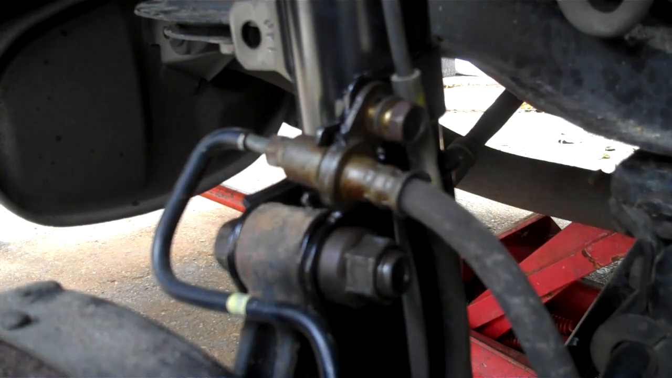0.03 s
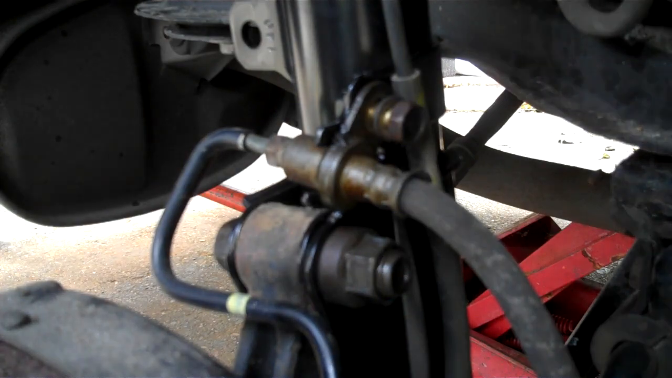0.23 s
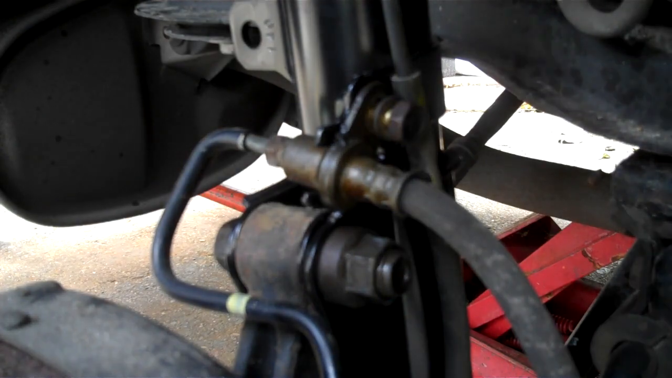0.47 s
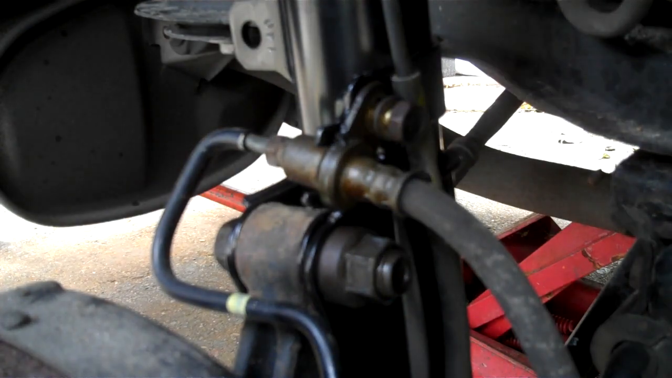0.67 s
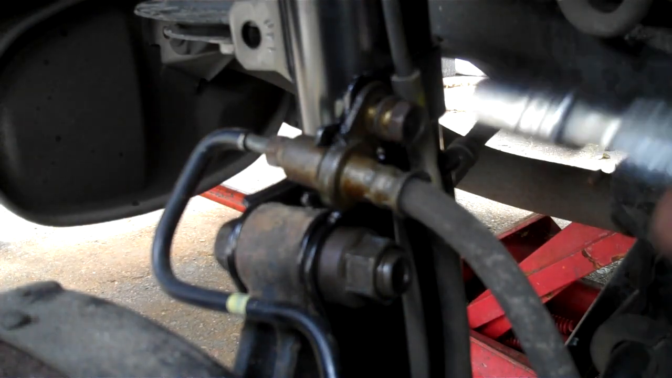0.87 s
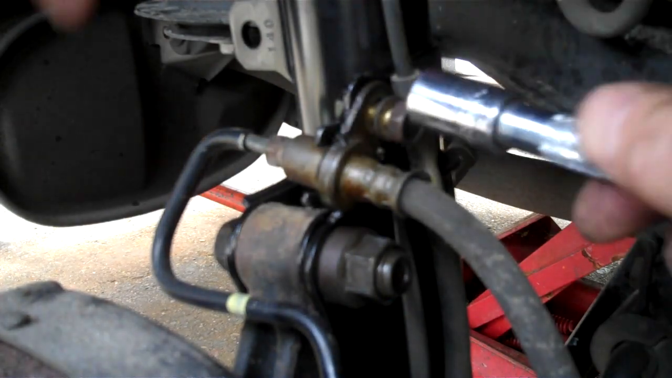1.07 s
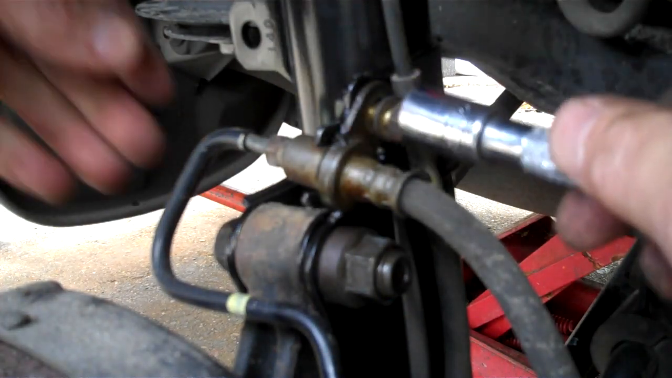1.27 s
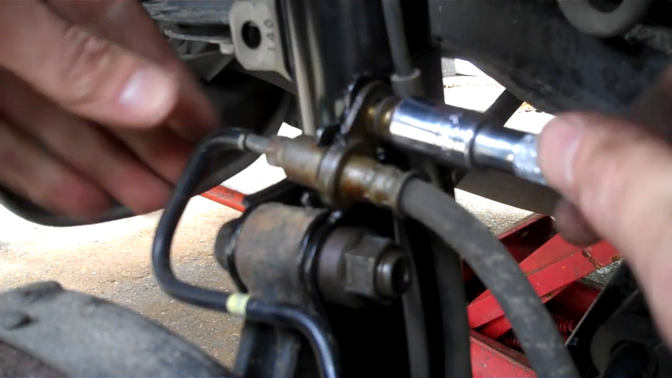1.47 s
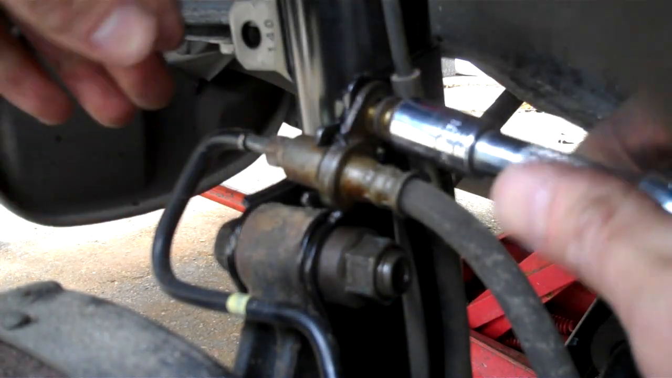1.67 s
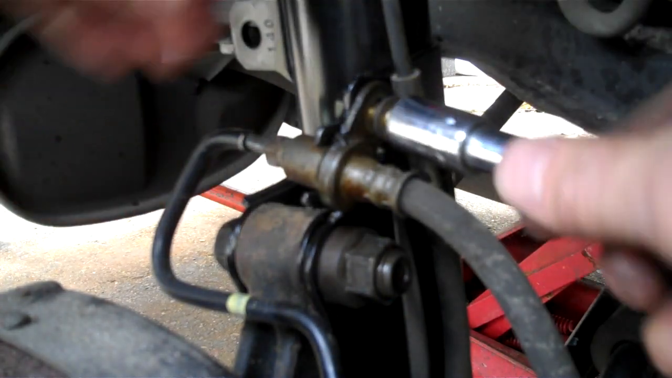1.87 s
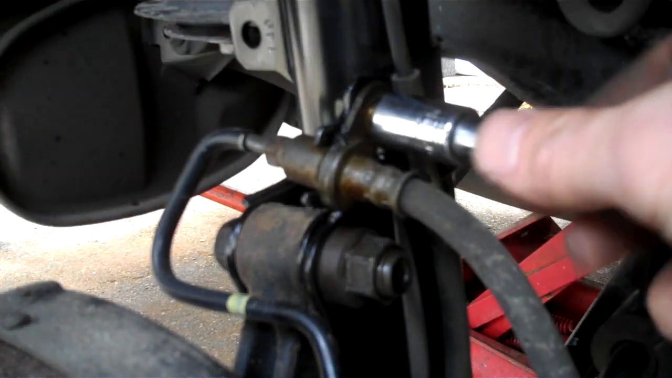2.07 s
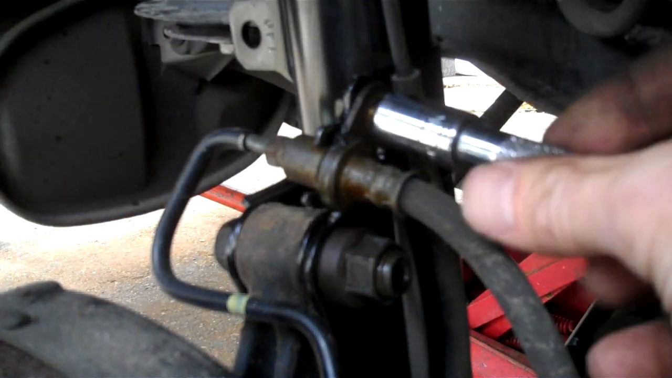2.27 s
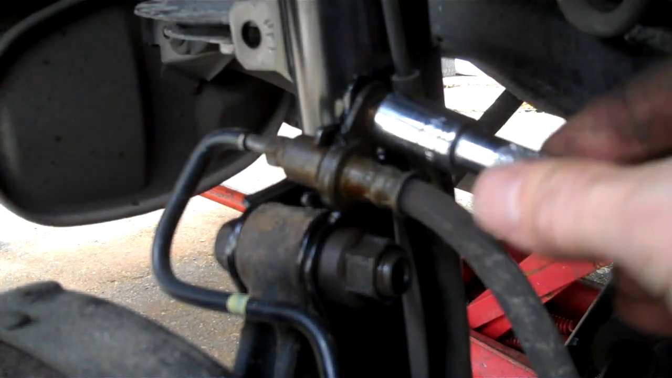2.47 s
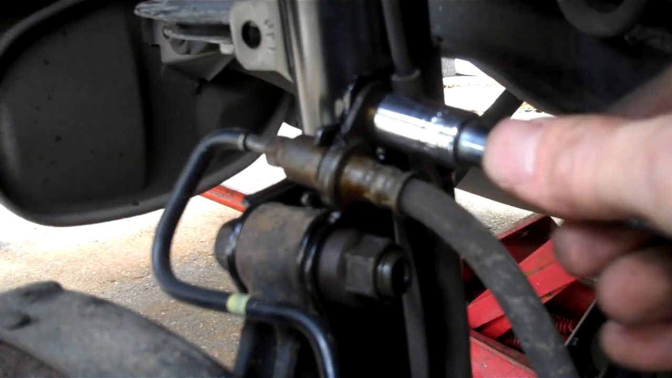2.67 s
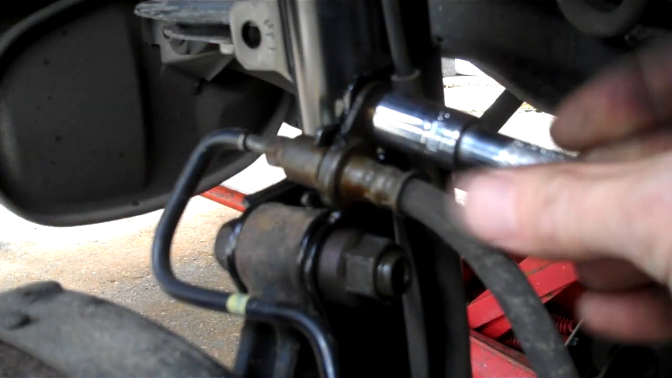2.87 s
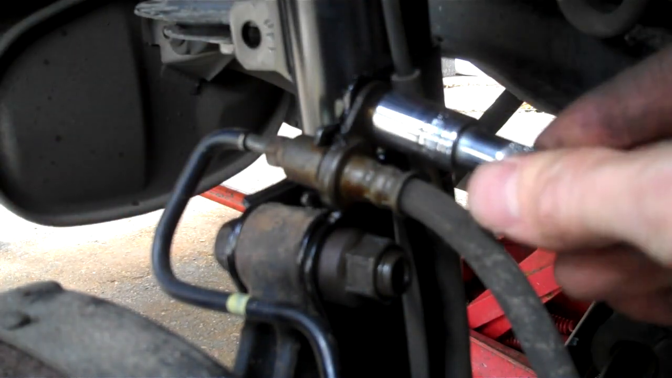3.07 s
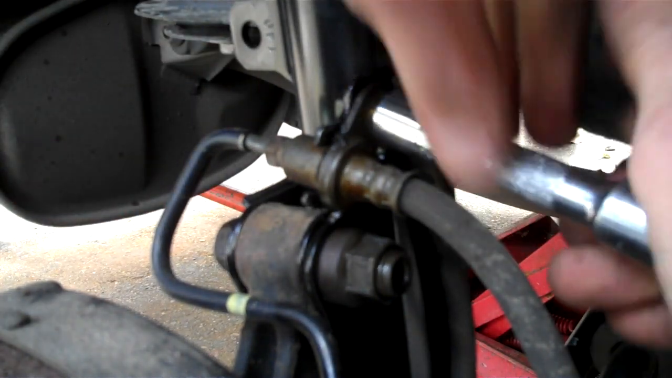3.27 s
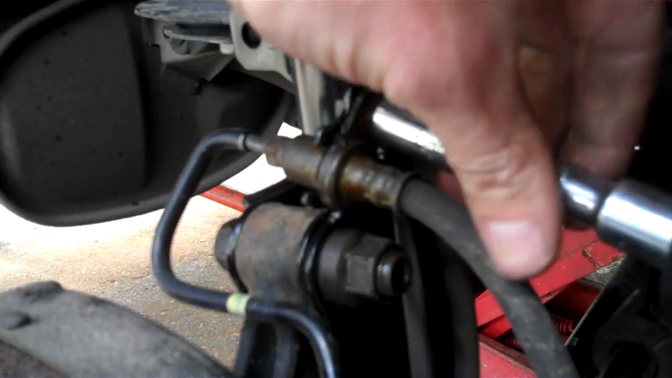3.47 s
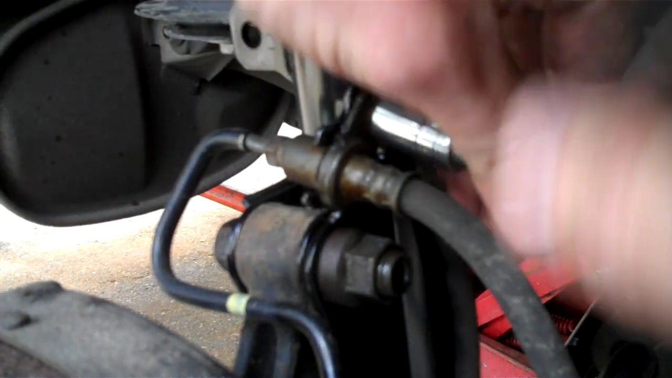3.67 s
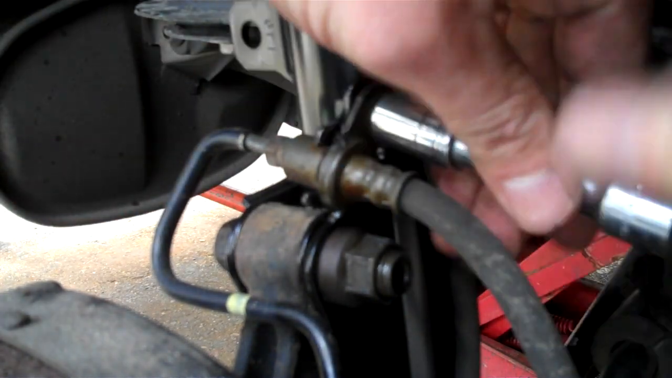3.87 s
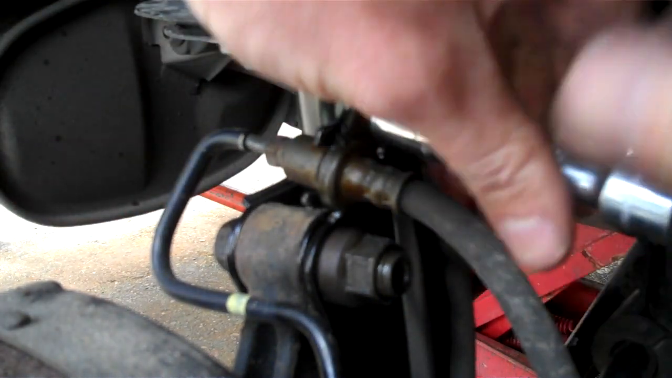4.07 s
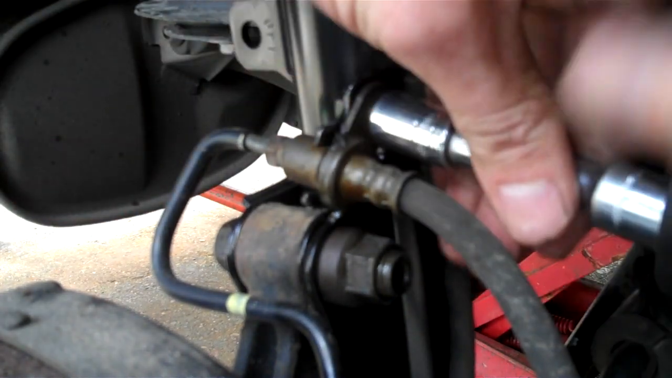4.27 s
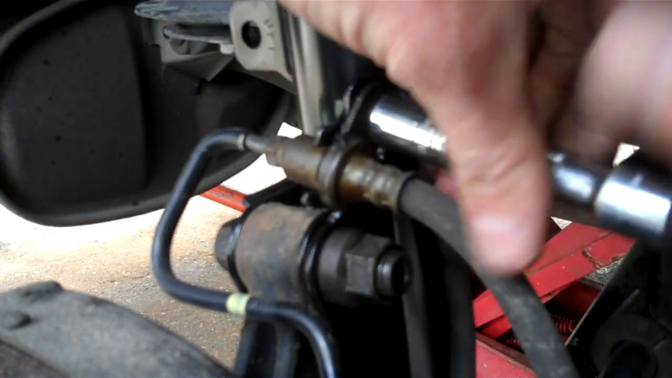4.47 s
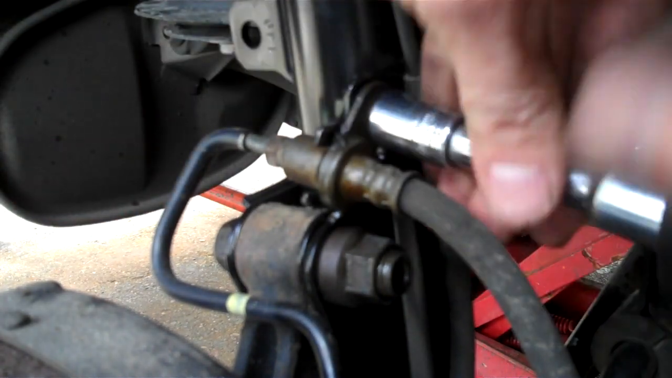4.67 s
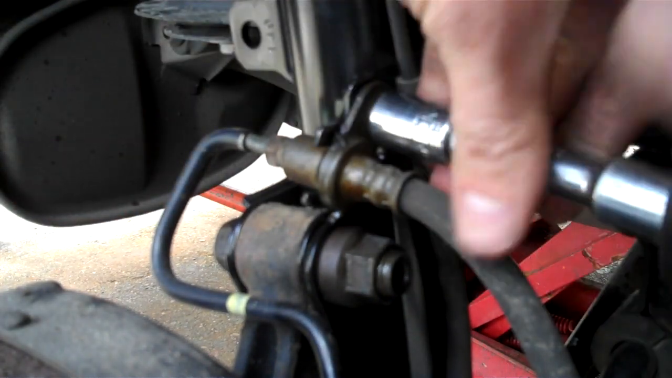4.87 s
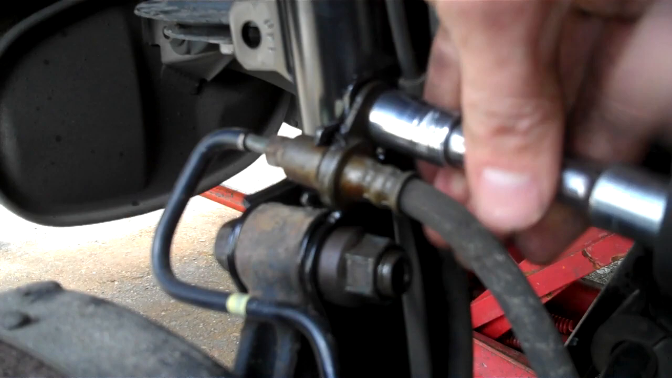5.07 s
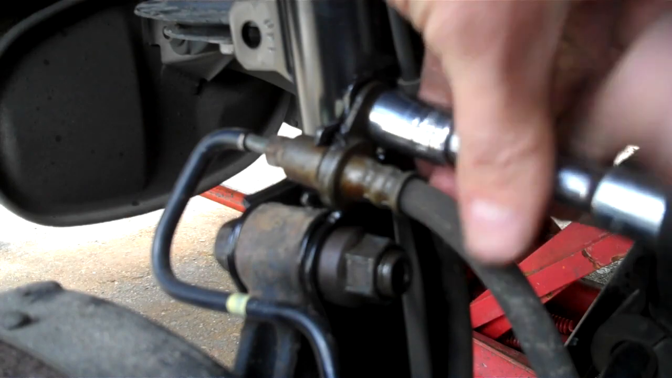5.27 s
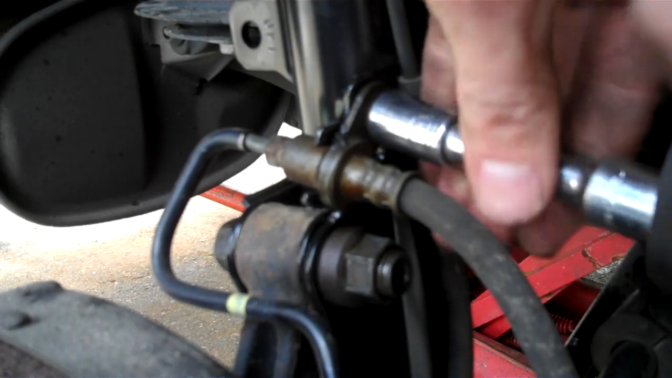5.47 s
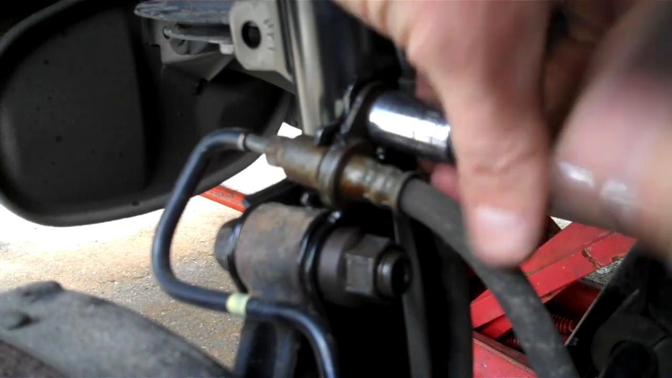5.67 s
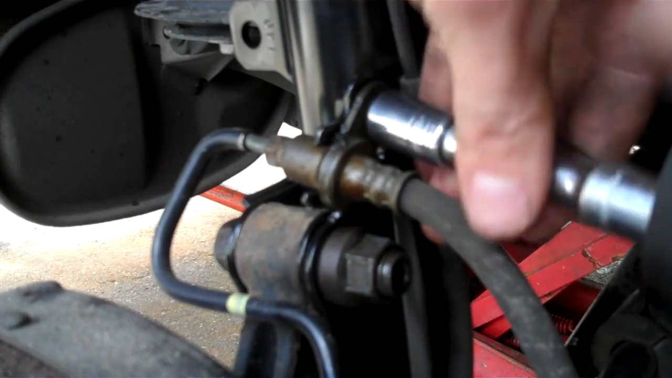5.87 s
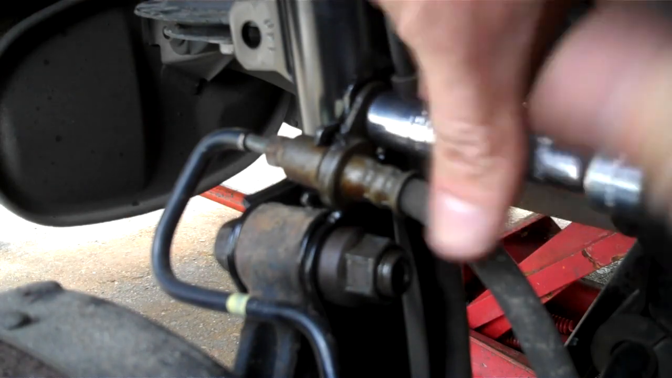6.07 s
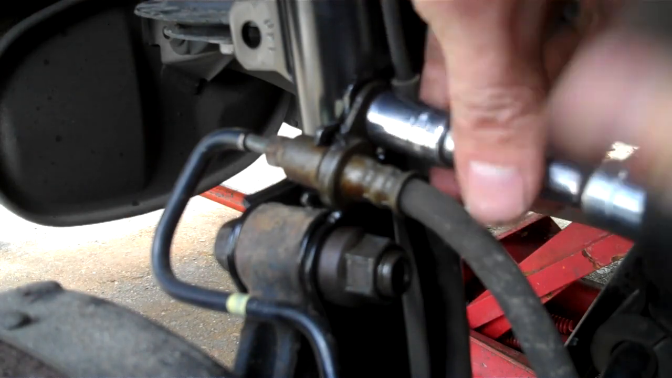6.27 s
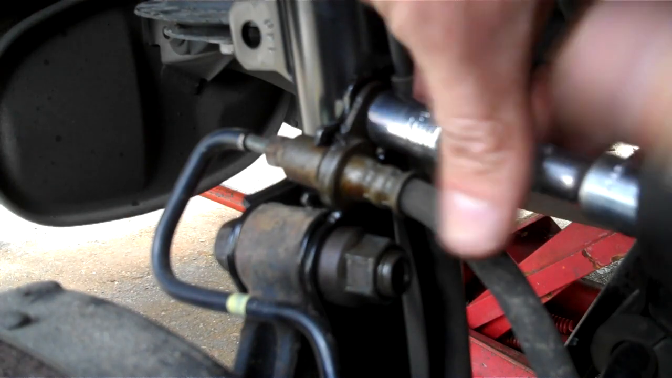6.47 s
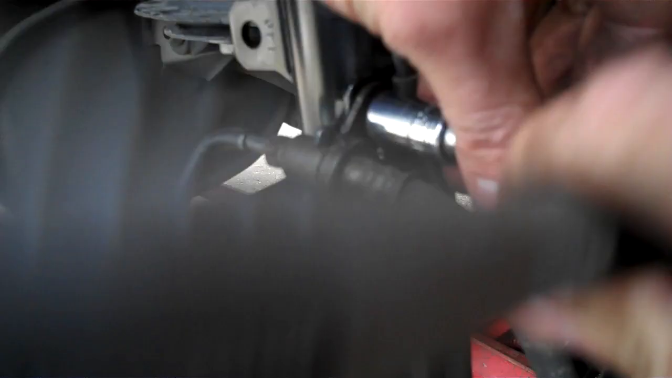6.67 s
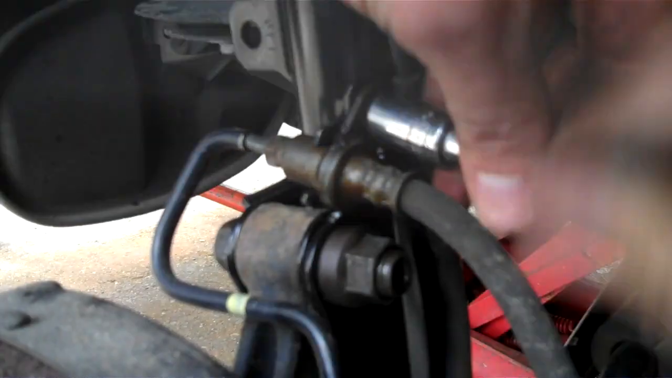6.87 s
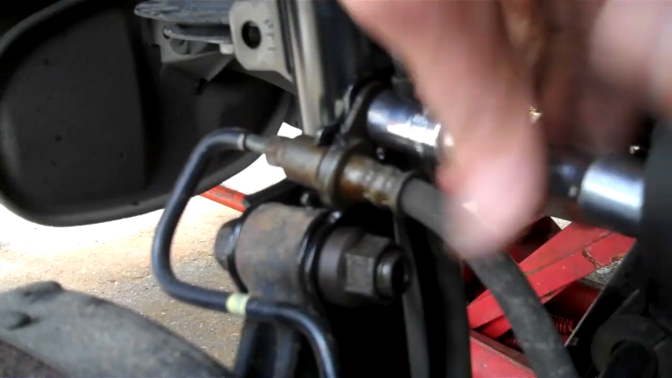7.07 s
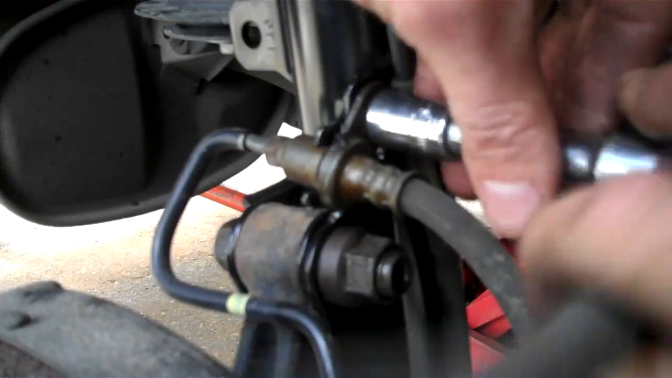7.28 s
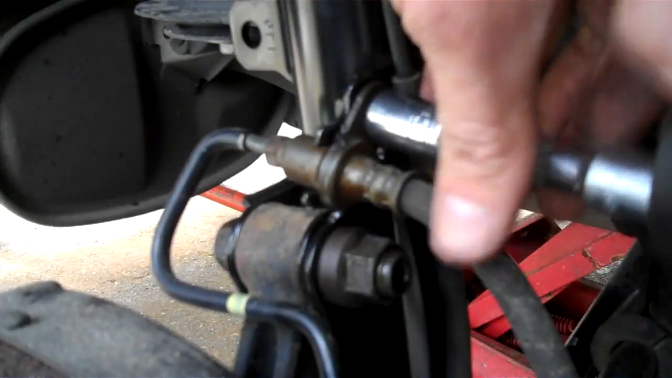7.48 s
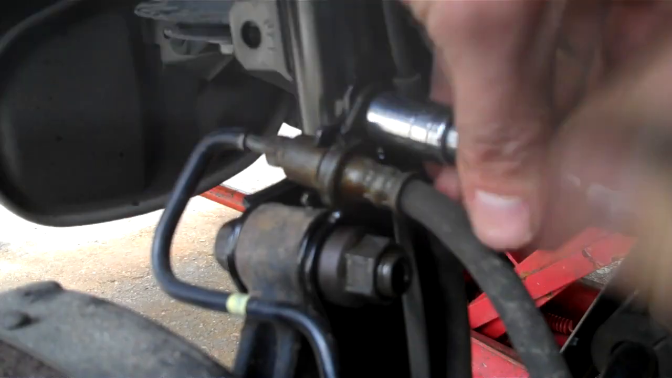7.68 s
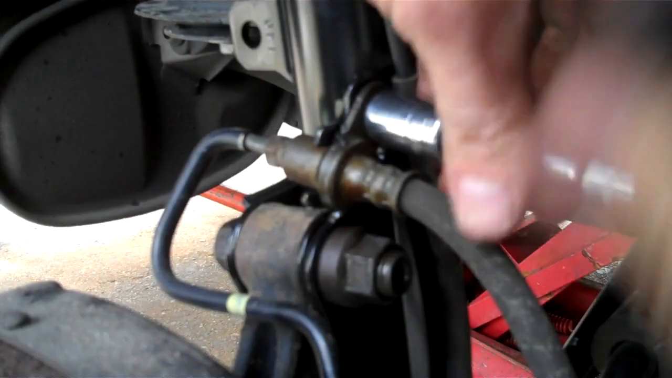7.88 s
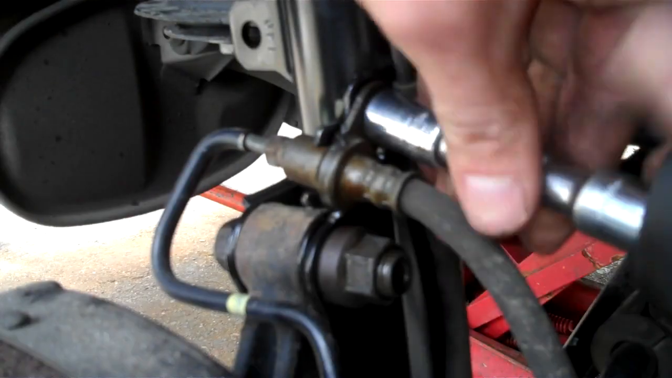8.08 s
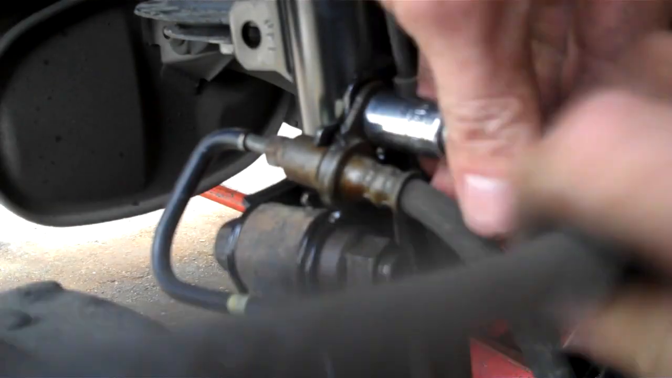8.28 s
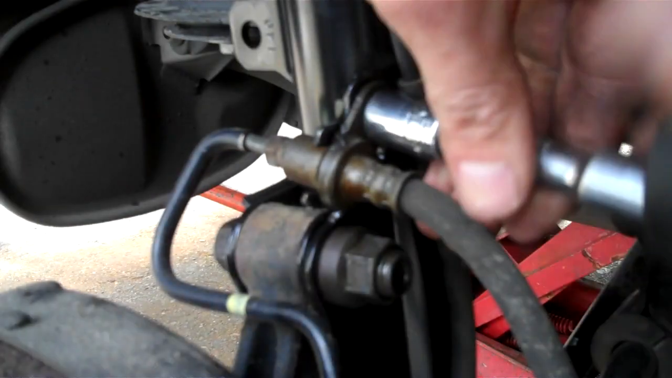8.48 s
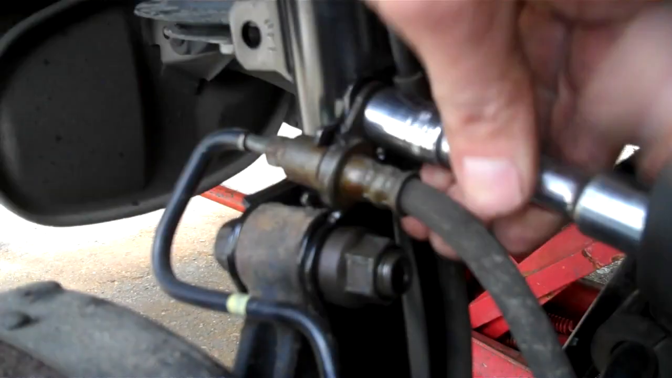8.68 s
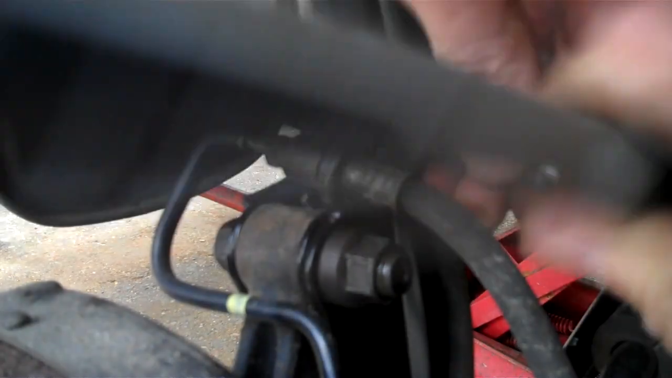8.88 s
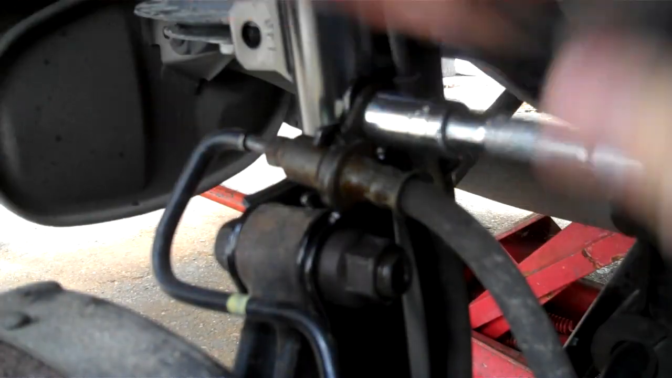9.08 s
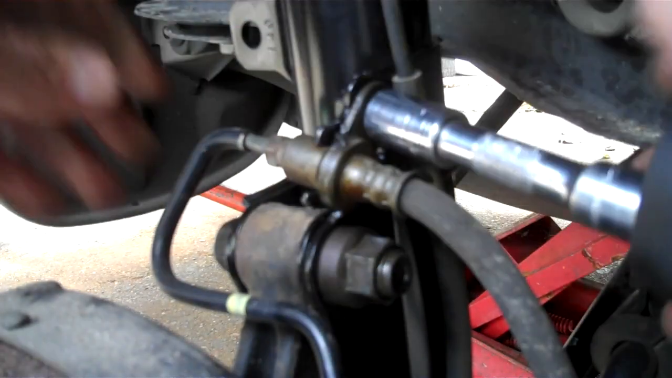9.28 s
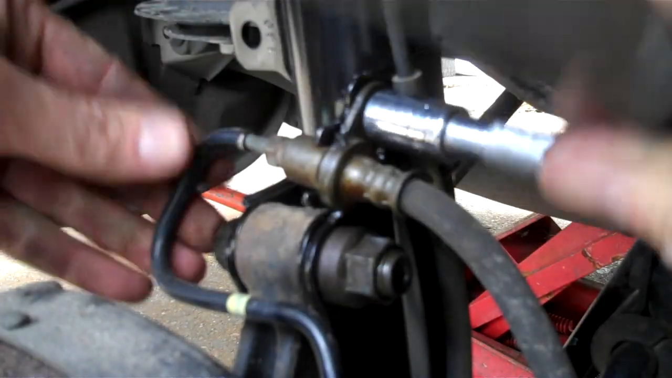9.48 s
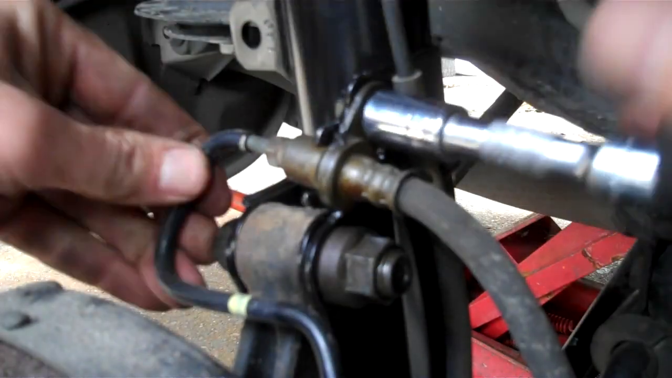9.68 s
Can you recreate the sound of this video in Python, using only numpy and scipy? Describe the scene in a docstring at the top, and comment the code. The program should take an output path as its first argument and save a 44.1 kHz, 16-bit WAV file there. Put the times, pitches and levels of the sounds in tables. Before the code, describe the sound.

Very close to the microphone in a quiet garage with faint hiss: light skin and sleeve rubs and dry ticks, then a sharp double clack as a steel socket seats on a bolt. After some loose knocks, a ratchet clicks in fast bursts, each stroke fading and ending in a dull metal knock, over a faint gritty thread grind. Around five seconds something thumps the microphone loudly.

```python
"""Hands and sleeve rub and tick on a tool in a garage: filtered noise in small catches.
Socket and extension knock in their play: noise bursts, with damped modes of socket, bracket and strut.
From 2.6 s a pawl snaps over ratchet teeth, stroke by stroke: noise cracks and steel modes; from 3 s
the bolt's thread grinds: uneven noise. At 5.2 s the handle bumps the camera: case modes, rattle, push.
From 7.2 s a faint sine hum wavers. Noise for air and microphone hiss runs throughout."""
import sys
import numpy as np
from scipy import signal
from scipy.fft import rfft, irfft, next_fast_len
from scipy.io import wavfile
from scipy.ndimage import uniform_filter1d, map_coordinates

SR = 44100
rng = np.random.default_rng(int(sys.argv[2]) if len(sys.argv) > 2 else 0)


def to_wav(s):
    """Save 16-bit WAV."""
    ch = np.atleast_2d(s).T  # columns
    pcm = np.round(np.clip(ch, -1, 1) * 32767)  # PCM
    wavfile.write(sys.argv[1], SR, pcm.astype(np.int16))


N = 429534

# All levels in the tables are relative, ahead of the layer gains.
# Still air and microphone hiss, colour: (frequency [Hz], density [dB per Hz])
AIR_COLOUR = [(15, -48.5), (25, -3), (115, 3), (250, -4), (363, 1), (475, -15), (749, -3.5), (1120, -21.5),
              (1240, -5.5), (1910, -14), (3930, -10), (7280, -9), (10000, -18.5), (13800, -17),
              (15000, -38.5)]
# Likeness of left and right noise: (frequency [Hz], correlation [1])
LEFT_RIGHT_LIKENESS = [(60, 0.73), (400, 0.89), (1200, 0.69), (2400, 0.59), (4400, 0.079), (12000, 0.046)]
# Decay of the garage: (frequency [Hz], t60 [s])
GARAGE_DECAY = [(200, 0.25), (1500, 0.79), (7000, 0.19), (14000, 0.1024)]

# Rubs of hand and sleeve: (middle [s], length [s], swish level [dB], scuff level [dB])
RUBS = [(0.302, 0.53, -48.5, -57.5), (0.801, 0.12, -35, -56), (.95, 0.26, -49.5, -63),
        (1.793, 0.27, -53, -63.5), (2.25, 0.33, -41.5, -55), (3.0, 0.29, -51, -62.5),
        (3.356, 0.25, -38.5, -55.5)]
# Short slides of socket and fingers: (middle [s], length [s], metal scrape level [dB], scuff level [dB])
SLIDES = [(.18, 0.088, -45, -82), (.301, 0.029, -39, -43.5), (1.596, .016, -55, -66),
          (1.793, .065, -43.5, -72), (1.94, 0.035, -35, -52.5), (3.28, 0.049, -38, -59),
          (3.46, 0.058, -34.5, -60), (4.06, .025, -42, -52), (4.804, .045, -49.5, -75),
          (5.654, 0.023, -43, -51), (6.085, 0.031, -33.5, -44.5), (7.799, .039, -49, -68),
          (8.432, .032, -46.5, -59), (9.304, .042, -38.5, -60)]
# Dry ticks of handling: (time [s], level [dB])
TICKS = [(0.197, -24.5), (0.218, -20.5), (0.436, -19.5), (0.534, -20), (0.796, -15)]
# Steady rubbing once the hands work the handle: (start [s], swish level [dB], scuff level [dB])
WORKING_RUB = (3.3, -56, -66.5)
# Colours of rubbing: (frequency [Hz], density [dB per Hz])
SWISH_COLOUR = [(1060, -56), (1800, -18), (2660, -21), (3090, -18.5), (4410, -12), (7380, -1.5),
                (9290, -15.5), (13800, -23), (14600, -34.5), (15000, -86)]
SCUFF_COLOUR = [(150, -61.5), (250, -22), (490, -5.5), (1030, -5), (1190, -5.5), (1780, -9), (2660, -5.5),
                (3500, -11), (4550, -12.5), (7700, -120)]

# Further knocks in the play of the drive, from fitting and shifting the grip and some dull rebounds after a
# bite: (time [s], level [dB], extra weight on bracket and shank [dB])
LOOSE_KNOCKS = [(1.2574, -15.5, 0), (1.3096, -32, -3.5), (1.384, -5.5, -11), (1.3918, -1, 3),
                (1.8415, -28, -14), (1.956, -18.5, 3.5), (2.0502, -15.5, -9), (2.064, -1.5, 6),
                (2.3801, -18, -5.5), (2.495, -16, 3.5), (2.8175, -27, -0.5), (2.8284, -26.5, -1),
                (2.9216, -14.5, -6), (3.1214, -23.5, -18), (3.2115, -14.5, 1), (4.515, -16, -4),
                (5.1192, -18, -7), (5.9187, -25, -10.5), (7.479, -23.5, -16), (7.6349, -19, 7),
                (8.7253, -14.5, -1), (9.0089, -16.5, -4), (9.2842, -15.5, 4), (9.5842, -17, 1),
                (9.6899, -24.5, 1.5), (9.7245, -12, -2.5)]
# Colours of socket and shank: (frequency [Hz], density [dB per Hz])
SOCKET_COLOUR = [(1060, -32.5), (1800, -20.5), (2430, -10.5), (3600, -1.5), (3890, -13), (4330, 1),
                 (5040, -1.5), (7780, 4), (10200, -21), (14000, -23.5), (15000, -40)]
SHANK_COLOUR = [(500, -25.5), (1000, -13), (1400, -2), (1900, -12), (2800, -8.5), (5000, -49)]
# Modes of the socket, free until it sits on the bolt: (frequency [Hz], level [dB], t60 [s])
FREE_SOCKET_MODES = [(2911, -10, .15), (3612, -9, .08), (4260, -8, .12), (4345, -5, .085), (4478, -5, .07),
                     (5293, -10, .07), (7200, -8, .09), (7665, -6, .1)]
# Modes of bracket and strut: (frequency [Hz], level [dB], t60 [s])
BRACKET_MODES = [(307.2, -2.5, 0.28), (362.7, -3.5, 0.24), (483, -22, 0.12), (685, 3.5, 0.069),
                 (764.5, -1, 0.22), (852.5, -1.5, 0.15), (956, -7.5, 0.11)]
STRUT_MODES = [(1249, -13.5, 0.79), (1236, -15.5, 0.61), (1600, -31.5, 0.2), (2075, -20, .7),
               (2911, -13, 0.13), (3270, -19.5, .5)]
SEATED_S = 1.388
# An ordinary knock, what it puts into bracket and shank, and their growth with a harder one
KNOCK_DB, BRACKET_DB, SHANK_DB = -15.5, -41, -35.5
BRACKET_DB_PER_DB, SHANK_DB_PER_DB = 0.27, 0.75

# Back strokes; slowness = extra tooth time at that end relative to mid-stroke. A slack knock
# precedes the first tooth; a bite knock of the drive follows the last:
# (first tooth [s], last tooth [s], teeth [count], start slowness [1], end slowness [1],
#  first level [dB], last level [dB], slack lead [s], slack level [dB], bite delay [s], bite level [dB])
STROKES = [(2.5671, 2.5673, 1, 0, 0, -0.5, -0.5, 0.02, -41, 0.02, -40.5),
           (2.5936, 2.6526, 10, -0.45, -0.1, -5, -12, 0.019, -40, 0.17, -25.5),
           (3.524, 3.5925, 3, 0.35, 0, -5, -5, 0.021, -36, 0.02, -40),
           (3.619, 3.7962, 18, 1.32, 2.5, -7, -16.5, 0.02, -36, 0.078, -25.5),
           (4.1384, 4.255, 15, 1.15, 0.7, -4.5, -14, 0.042, -11, 0.073, -28),
           (4.543, 4.6856, 18, 0.57, 0.5, -4.5, -13.5, 0.02, -9, 0.034, -25.5),
           (4.9514, 5.0784, 16, 0.27, 0.05, -4, -14, 0.04, -11, 0.038, -18.5),
           (5.3166, 5.4461, 14, -0.5, 0.37, -12.5, -15, 0.018, -27, 0.047, -20.5),
           (5.6866, 5.8536, 14, 0.4, 1.2, -5, -13.5, 0.014, -19, 0.026, -21.5),
           (6.083, 6.27, 14, 0.13, 2.5, -4.5, -12.5, 0.048, -19, 0.065, -19.5),
           (6.546, 6.694, 11, 0.42, 1.5, -3, -12, 0.02, -35, 0.02, -46),
           (6.7163, 6.864, 10, -0.71, -0.7, -11.5, -12.5, 0.019, -40, 0.074, -14),
           (7.1783, 7.3589, 19, 1.67, 1.85, -4, -16, 0.036, -19, 0.039, -10.5),
           (7.5789, 7.6907, 14, 0.55, 1.96, -3.5, -12.5, 0.04, -15.5, 0.06, -13.5),
           (7.9157, 8.0259, 17, 1.7, 2.5, -6, -13.5, 0.025, -13, 0.0605, -14),
           (8.2359, 8.3374, 14, 0.6, 1.2, -4.5, -14.5, 0.021, -14.5, 0.047, -19.5),
           (8.553, 8.6553, 13, 0.41, 2, -5, -12.5, 0.032, -14.5, 0.063, -15),
           (8.854, 8.9349, 13, 0.82, 1.2, -4.5, -14, 0.021, -18.5, 0.044, -18.5),
           (9.1193, 9.1971, 9, 0.47, 2.6, -6.5, -12.5, 0.018, -18, 0.06, -12.5),
           (9.4233, 9.4889, 10, 0.6, 1.2, -3, -10.5, 0.036, -16.5, 0.075, -9.5)]
# Slack closes with a second knock; the bite rebounds once, dully
SETTLE_LEAD_S, SETTLE_DB = .014, -6
REBOUND_S, REBOUND_DB, REBOUND_WEIGHT_DB = .024, -10, 1
EASE_POWER, FADE_POWER = 3, 0.57  # fade below 1: clicks weaken fastest early in a stroke
TOOTH_SCATTER_DB, TOOTH_JITTER_S = 1.2, .0005  # jitter peaks in mid-stroke
LAST_TOOTH_DB = 1.5  # the last click of each stroke stands out, louder by this [dB]
# Ratchet head before and after the second hand closes round the extension:
# (frequency [Hz], left density [dB per Hz], right density [dB per Hz])
OPEN_HEAD_COLOUR = [(200, -37, -49), (1000, -32, -33.5), (2030, -24.5, -29), (3500, -20.5, -21.5),
                    (4960, -21, -14), (5850, 1, 9), (6500, -1.5, -20), (7400, 1, -33), (8300, -24, -25),
                    (11000, -18.5, -45), (13970, -27.5, -54)]
HELD_HEAD_COLOUR = [(216, -55, -45.5), (652, -29.5, -33), (1100, -29.5, -30.5), (1400, -23.5, -24),
                    (1780, -26, -27), (2940, -16, -15.5), (3430, -13, -12.5), (3920, -16, -13.5),
                    (5075, -7.5, -9), (5534, -13.5, 4), (6420, 3.5, -9), (7680, 2.5, -28),
                    (8760, -6, -26.5), (10860, -16.5, -23), (13860, -22, -68.5)]
REGRIP_S = 3.0
# First hard contact of the pawl, colour: (frequency [Hz], density [dB per Hz])
SNAP_COLOUR = [(500, -27.5), (2000, -17), (4000, -3), (7500, 12), (10000, -6.5), (14000, -10.5)]
# Modes of the ratchet's steel: (frequency [Hz], level [dB], t60 [s])
STEEL_MODES = [(3510, -16, .05), (5750, -6, .03), (6595, 0, .028), (7112, -1, .028), (7650, -3, .026),
               (8188, -6, .03)]
# Boost of the head's lower range by firm pressure, easing as the bolt runs free: (time [s], boost [dB])
PRESSURE = [(5.0, 4.3), (8.0, 1)]

# Grinding of the thread, colour: (frequency [Hz], density [dB per Hz])
THREAD_COLOUR = [(150, -1), (260, -15), (320, 12), (400, -24), (560, -9.5), (780, 10.5), (1000, -13),
                 (1280, 4.5), (1600, -15), (4000, -15.5), (9000, -43.5)]
GRIND_DB, GRIND_RISE_DB, GRIND_SWELL_S = -59.5, 10.5, .15  # between strokes; rise within; averaging time

# A blow on the camera, then small low thumps: (time [s], case ring level [dB], push level [dB])
BUMPS = [(5.2045, 11, -12), (6.549, -36, -26), (6.559, -36, -27), (7.917, -42, -35)]
# Modes of the camera case: (frequency [Hz], level [dB], t60 [s])
CASE_MODES = [(225, -34, .1), (335, -32, .12), (362, -23, .22), (375, -8, .038), (440, -7, .033),
              (478, -22, .1), (542, -25, .08), (738, -21, .1), (770, -12, .032), (870, -27, .08),
              (1300, -6, .017), (2100, -12, .014)]
# Loose parts inside the camera, colour: (frequency [Hz], density [dB per Hz])
RATTLE_COLOUR = [(100, -24), (250, 0.5), (400, -3), (600, -11.5), (760, 0), (1000, -14.5), (1500, -33.5),
                 (4000, -34.5)]

HUM_HZ = 90
TOP_HZ = 14400


def amp(db):
    """Decibels to gain."""
    return 10 ** (np.asarray(db) / 20)


def unit(x):
    """Scale to rms 1."""
    return x / np.sqrt(np.mean(x ** 2) + 1e-20)


def along(points, hz):
    """Interpolate (frequency [Hz], value) points on a log-frequency axis."""
    f, v = np.transpose(points)
    return np.interp(np.log(hz + 1), np.log(f), v)


def curves(rows):
    """One value per sample for each column after the time."""
    s, *cols = np.transpose(rows)
    return [np.interp(np.arange(N) / SR, s, c) for c in cols]


def wobble(rate_hz):
    """Random curve, linear between rate_hz knots a second."""
    knots = rng.standard_normal(int(N * rate_hz / SR) + 4)
    return map_coordinates(knots, [np.arange(N) * rate_hz / SR], order=1)


def filtered(x, response):
    """Apply a response of frequency to the spectrum of x."""
    m = next_fast_len(N + SR // 4)
    return irfft(rfft(x, m) * response(np.fft.rfftfreq(m, 1 / SR)), m)[..., :N]


def noise(left, right=None):
    """Stereo coloured noise of rms 1, alike at both ports in the bass, nearly unrelated in the treble."""
    right = left if right is None else right

    def mid_side_gains(hz):
        turn = np.arccos(np.clip(along(LEFT_RIGHT_LIKENESS, hz), -1, 1)) / 2
        return np.array([np.cos(turn), np.sin(turn)])

    def colour(hz):
        return amp([along(left, hz), along(right, hz)])

    mid, side = filtered(rng.standard_normal((2, N)), mid_side_gains)
    return unit(filtered(np.array([mid + side, mid - side]), colour))


def add(track, s, sound):
    """Mix a sound into a track at time s."""
    start = max(round(s * SR), 0)
    part = track[..., start:start + sound.shape[-1]]
    part += sound[..., :part.shape[-1]]


def ring(modes, t, scatter_db, detune=0.):
    """Sum damped sine modes, each with random strength and relative detuning."""
    hz, db, t60 = np.transpose(modes)[:, :, None]
    strength, shift = rng.standard_normal((2, len(modes), 1))
    decay = amp(db + scatter_db * strength - 60 * t / t60)
    return np.sum(decay * np.sin(2 * np.pi * hz * (1 + detune * shift) * t), 0)


def bursts(rows, rise_s, t60_s, tail_db, tail_t60_s):
    """Envelope of blows (time [s], level [dB]): fast burst plus scatter tail, summed in power."""
    t, power = np.arange(SR // 5) / SR, np.zeros(N)
    decay = amp(-60 * t / t60_s) + amp(tail_db - 60 * t / tail_t60_s)
    shape = (1 - np.exp(-(t / rise_s) ** 2)) * decay
    for s, db in rows:
        add(power, s, (amp(db) * shape / shape.max()) ** 2)
    return np.sqrt(power)


def panned(x, lead_db):
    """Louder on the left by lead_db."""
    return x * amp([[lead_db / 2], [-lead_db / 2]])


def swell(middle_s, length_s):
    """Smooth Gaussian rise and fall."""
    return np.exp(-np.minimum((2 * (np.arange(N) / SR - middle_s) / length_s) ** 2, 20) / 2)


def patchy(x, depth_db, size=(3, 16)):
    """Reflections off moving hands: random gain over frequency and time, rms 1 out."""
    z = signal.stft(x, nperseg=256)[2]
    across_hz = uniform_filter1d(rng.standard_normal(z.shape), size[0], 1)
    field = uniform_filter1d(across_hz, size[1], 2)
    return unit(signal.istft(z * amp(depth_db * unit(field)), nperseg=256)[1][:, :N])


def air():
    """Still air and microphone hiss: steady coloured noise."""
    return panned(noise(AIR_COLOUR), lead_db=2)


def hands(tick_db=-8):
    """Skin, sleeve and steel slide in small catches; a faint rubbing stays once the hands work."""
    start_s, working_swish_db, working_scuff_db = WORKING_RUB
    working = np.clip((np.arange(N) / SR - start_s) * 10, 0, 1)
    swish = amp(working_swish_db) * working
    scuff = amp(working_scuff_db) * working
    scrape = np.zeros(N)
    for s, length_s, swish_db, scuff_db in RUBS:
        shape = swell(s, length_s)
        swish = swish + amp(swish_db) * shape
        scuff = scuff + amp(scuff_db) * shape
    for s, length_s, scrape_db, scuff_db in SLIDES:
        shape = swell(s, length_s)
        scrape = scrape + amp(scrape_db) * shape
        scuff = scuff + amp(scuff_db) * shape
    catches = amp(1.2 * wobble(300) + 3.65 * wobble(25))
    rub = catches * (swish * patchy(noise(SWISH_COLOUR), depth_db=1) + scuff * noise(SCUFF_COLOUR))
    grating = scrape * amp(wobble(200)) * patchy(noise(SOCKET_COLOUR), depth_db=3.5)
    tick_noise = noise([(100, -9), (2000, -5.5), (7000, 6.0), (14000, -20)])
    ticks = tick_noise * bursts(TICKS, rise_s=0.00028, t60_s=0.015, tail_db=-18.5, tail_t60_s=0.49)
    return panned(rub + grating + amp(tick_db) * ticks, lead_db=3)


def garage(x):
    """Room answer: noise whose decay differs with frequency, convolved with x."""
    hz, t, z = signal.stft(rng.standard_normal((2, SR // 2)), SR, nperseg=256)
    decay = amp(-60 * t / along(GARAGE_DECAY, hz)[:, None])
    tail = signal.istft(z * decay, SR, nperseg=256)[1]
    return signal.fftconvolve(x, tail / np.linalg.norm(tail[0]), axes=1)[:, :N]


def knocks():
    """Rows (time [s], clack, bracket, shank levels [dB]): loose knocks, and pairs at each reversal."""
    rows = list(LOOSE_KNOCKS)
    for first_s, last_s, *_, slack_s, slack_db, bite_s, bite_db in STROKES:
        bite_at_s = last_s + bite_s
        rows += [(first_s - slack_s, slack_db, 0)]
        rows += [(first_s - SETTLE_LEAD_S, slack_db + SETTLE_DB, SETTLE_DB)]
        rows += [(bite_at_s, bite_db, 0)]
        rows += [(bite_at_s + REBOUND_S, bite_db + REBOUND_DB, REBOUND_WEIGHT_DB)]
    s, db, weight_db = np.transpose(rows)
    force_db = db - KNOCK_DB
    bracket_db = BRACKET_DB + BRACKET_DB_PER_DB * force_db + weight_db
    shank_db = SHANK_DB + SHANK_DB_PER_DB * force_db + weight_db
    return np.column_stack([s, db, bracket_db, shank_db])


def socket(clack_db=-7, shank_db=-3, bracket_db=-3, strut_db=-3, clink_db=-23):
    """Play in the drive closes with a clack that runs down the shank into bracket and strut."""
    rows = knocks()
    clack_env = bursts(rows[:, :2], rise_s=.001, t60_s=.019, tail_db=-22, tail_t60_s=.11)
    clack = patchy(noise(SOCKET_COLOUR), depth_db=3.5) * clack_env
    shank_env = bursts(rows[:, [0, 3]], rise_s=0.0022, t60_s=0.046, tail_db=-0.5, tail_t60_s=0.1)
    shank = noise(SHANK_COLOUR) * shank_env
    body, clink = np.zeros(N), np.zeros(N)
    t = np.arange(SR // 2) / SR
    short_t = t[:SR // 4]
    for s, knock_db, low_db, _ in rows:
        bracket = amp(low_db + bracket_db) * ring(BRACKET_MODES, short_t, scatter_db=2, detune=.04)
        add(body, s, bracket * (1 - np.exp(-short_t / 0.002)))
        add(body, s, amp(low_db + strut_db) * ring(STRUT_MODES, t, scatter_db=3, detune=0.0044))
        if s < SEATED_S:
            add(clink, s, amp(knock_db + clink_db) * ring(FREE_SOCKET_MODES, t, scatter_db=8))
    bright = panned(amp(clack_db) * clack + clink, lead_db=3.5)
    return bright + amp(shank_db) * shank + panned(body, lead_db=1.5)


def teeth():
    """Rows (time [s], level [dB]): clicks spaced by the handle's changing speed, fading in each stroke."""
    rows = []
    for first_s, last_s, count, slow_start, slow_end, first_db, last_db, *_ in STROKES:
        gaps = round(count) - 1
        way = (np.arange(gaps) + .5) / max(gaps, 1)
        gap_time = 1 + slow_start * (1 - way) ** EASE_POWER + slow_end * way ** EASE_POWER
        elapsed = np.append(0, np.cumsum(gap_time))
        s = first_s + (last_s - first_s) * elapsed / max(elapsed[-1], 1)
        done = np.linspace(0, 1, gaps + 1)
        db = first_db + (last_db - first_db) * done ** FADE_POWER + LAST_TOOTH_DB * (done == 1)
        rows.append(np.column_stack([s, db, np.sin(np.pi * done)]))
    s, db, unsteady = np.vstack(rows).T
    late, loud = rng.standard_normal((len(s), 2)).T
    return np.column_stack([s + TOOTH_JITTER_S * unsteady * late, db + TOOTH_SCATTER_DB * loud])


def pawl(crack_db=1, snap_db=-8, steel_db=-7):
    """The pawl snaps onto the next tooth and rebounds; each contact cracks and rings the head."""
    clicks = teeth()
    s, db = clicks.T
    late, soft, hard = rng.standard_normal((3, len(s)))
    rebounds = np.column_stack([s + .0019 * np.exp(.2 * late), db - 3 + soft])
    contacts = np.vstack([clicks, rebounds])

    held, opened = np.array(HELD_HEAD_COLOUR), np.array(OPEN_HEAD_COLOUR)
    open_noise = noise(opened[:, :2], opened[:, ::2])
    held_noise = noise(held[:, :2], held[:, ::2])
    head = np.where(np.arange(N) / SR < REGRIP_S, open_noise, held_noise)
    crack_env = bursts(contacts, rise_s=.001, t60_s=.013, tail_db=-24, tail_t60_s=.075)
    crack = patchy(head, depth_db=3.5) * crack_env * amp(3 * wobble(1100) - 1.5)

    # the hard first contact alone gets the snap
    snap_rows = np.column_stack([s, db + 3 * hard])
    snap_env = bursts(snap_rows, rise_s=.0009, t60_s=0.002, tail_db=-31, tail_t60_s=0.063)
    snap = noise(SNAP_COLOUR) * snap_env

    steel, t = np.zeros((2, N)), np.arange(SR // 16) / SR
    for at_s, level_db in contacts:
        both = np.array([ring(STEEL_MODES, t, scatter_db=3, detune=.011) for port in range(2)])
        add(steel, at_s, amp(level_db + steel_db) * both * (1 - np.exp(-t / .0007)))
    return amp(crack_db) * crack + amp(snap_db) * panned(snap, lead_db=12) + panned(steel, lead_db=7)


def pressed(x, corner_hz=4200):
    """Pressure couples the head to the extension, which radiates the lower range."""
    pressure_db, = curves(PRESSURE)
    low = filtered(x, lambda hz: 1 / (1 + (hz / corner_hz) ** 6))
    return x + (amp(pressure_db) - 1) * low


def thread():
    """Rusty thread grinds unevenly through the bracket as the bolt turns, most during strokes."""
    t = np.arange(N) / SR
    swinging = sum(1. * ((t > first_s) & (t < last_s)) for first_s, last_s, *_ in STROKES)
    level_db = GRIND_DB + GRIND_RISE_DB * uniform_filter1d(swinging, round(GRIND_SWELL_S * SR))
    turning = np.clip(t - REGRIP_S, 0, 1)  # fades in over 1 s
    catches = amp(3 * wobble(45))
    return panned(noise(THREAD_COLOUR), lead_db=-0.5) * turning * catches * amp(level_db)


def bumps(push_s=.0024, rattle_db=-19):
    """A blow on the camera rings and rattles its case and shoves the microphones; the later rows are small low
    thumps that come with the hardest clicks."""
    case, push, t = np.zeros(N), np.zeros(N), np.arange(SR // 3) / SR
    for s, case_db, push_db in BUMPS:
        onset = 1 - np.exp(-t / .0008)
        add(case, s, -amp(case_db) * ring(CASE_MODES, t, scatter_db=.5) * onset)
        add(push, s, -amp(push_db) * (1 - t / push_s) * np.exp(-t / push_s))
    blows = np.array(BUMPS)[:, :2]
    rattle_env = bursts(blows, rise_s=.003, t60_s=.06, tail_db=-12, tail_t60_s=.18)
    rattle = amp(rattle_db) * noise(RATTLE_COLOUR) * rattle_env
    return panned(case + rattle, lead_db=3) + panned(push, lead_db=29)


def hum(hum_db=-64, start_s=7.2):
    """Faint sine, wavering in level and phase, fading in from start_s."""
    t = np.arange(N) / SR
    level = amp(hum_db + 2.5 * wobble(6)) * np.clip((t - start_s) * 4, 0, 1)
    return level * np.sin(2 * np.pi * HUM_HZ * t + wobble(12))


def scene(room_db=-26, air_db=-57):
    """Tool and hands with a little room; thread, bumps, hum and air stay dry."""
    tool = hands() + socket() + pressed(pawl())
    return tool + amp(room_db) * garage(tool) + thread() + bumps() + hum() + amp(air_db) * air()


def record(dry):
    """Peaks flatten near 0.95 of full scale; a steep low-pass ends the band at TOP_HZ."""
    clipped = dry / (1 + np.abs(dry / .95) ** 16) ** (1 / 16)
    return filtered(clipped, lambda hz: 1 / np.sqrt(1 + (hz / TOP_HZ) ** 100))


dry = scene()
out = record(dry)
to_wav(out)
```